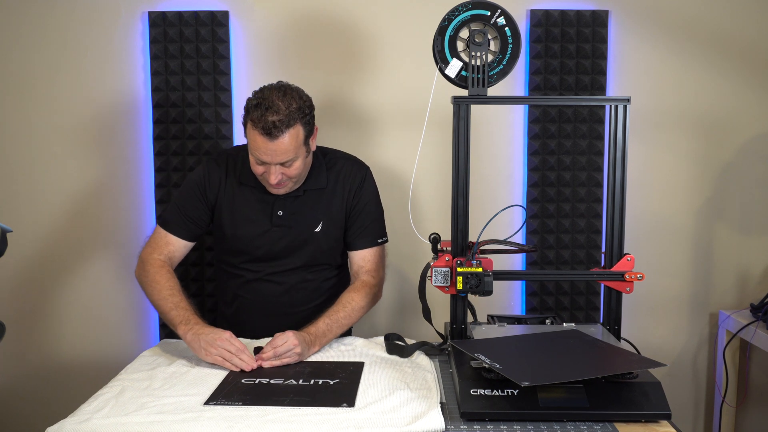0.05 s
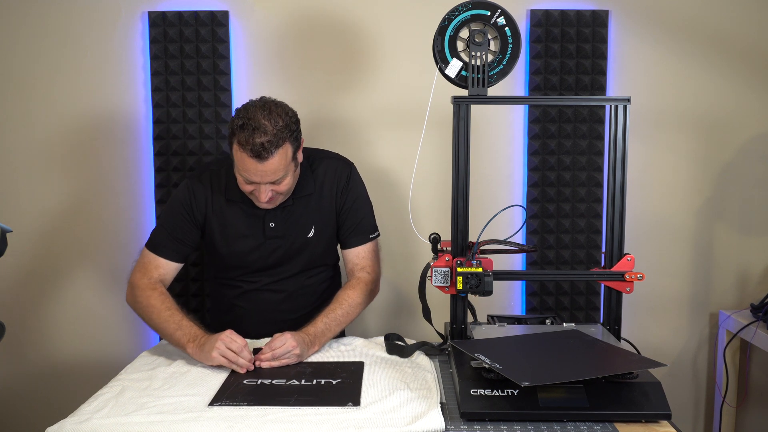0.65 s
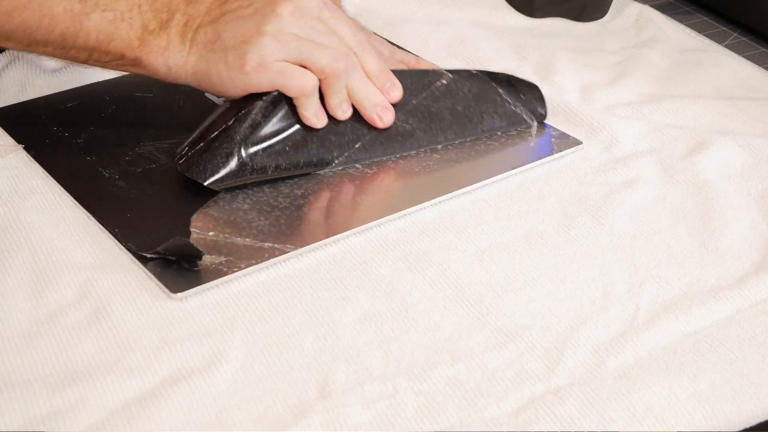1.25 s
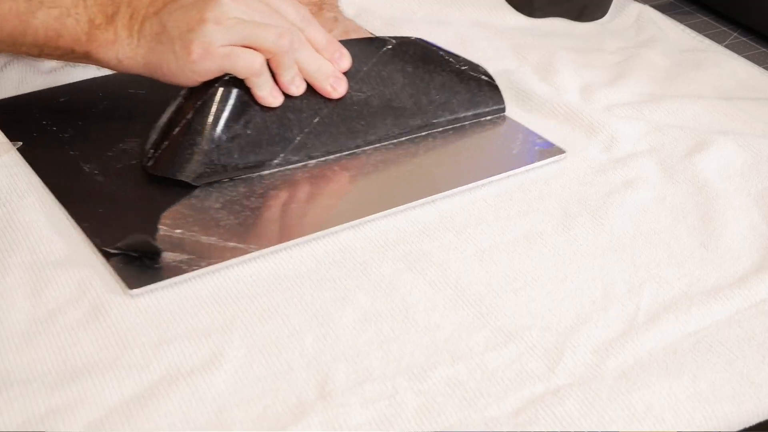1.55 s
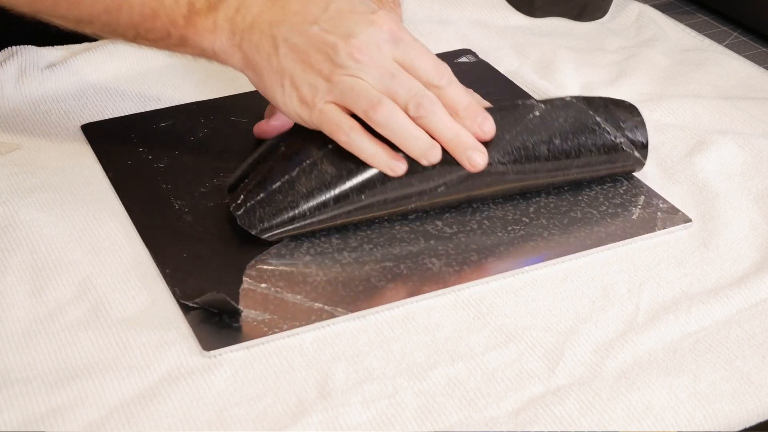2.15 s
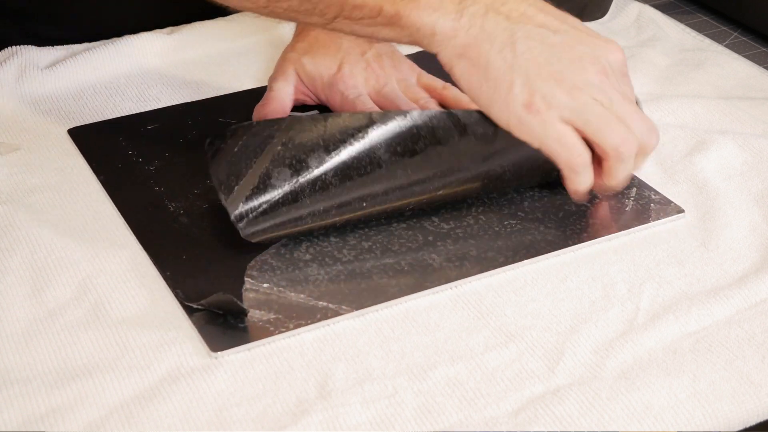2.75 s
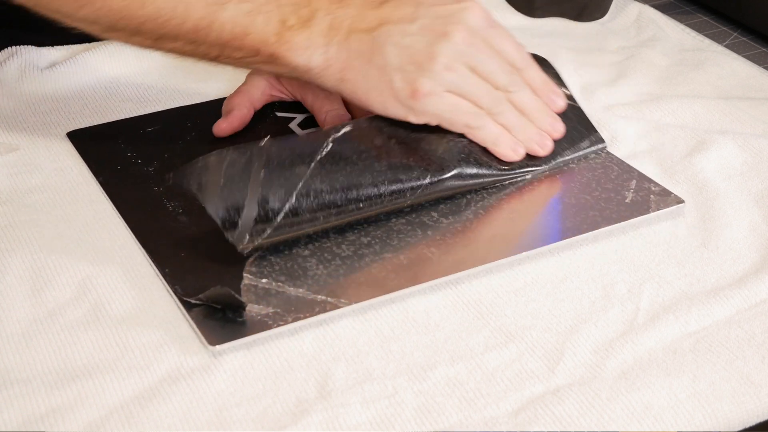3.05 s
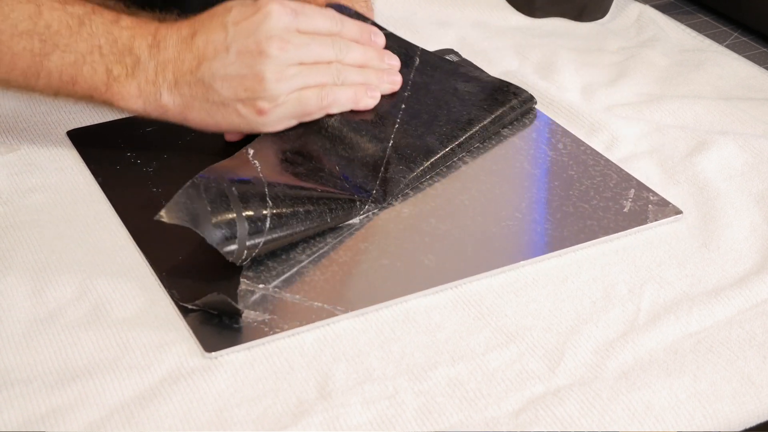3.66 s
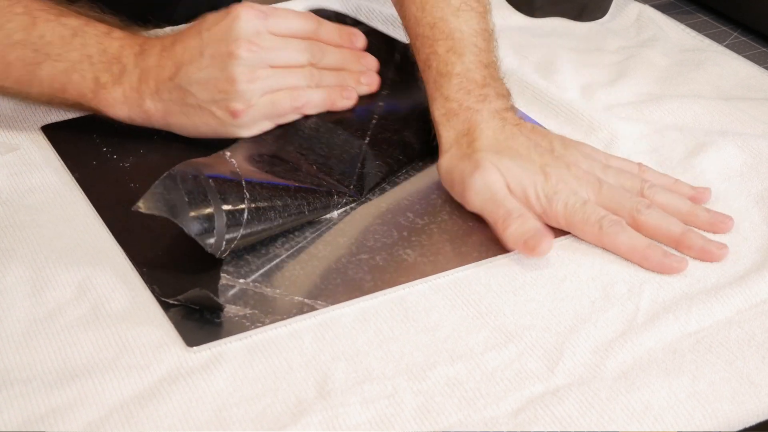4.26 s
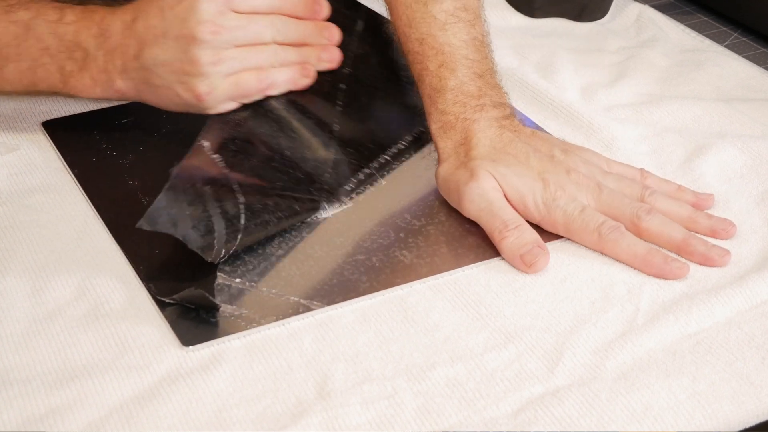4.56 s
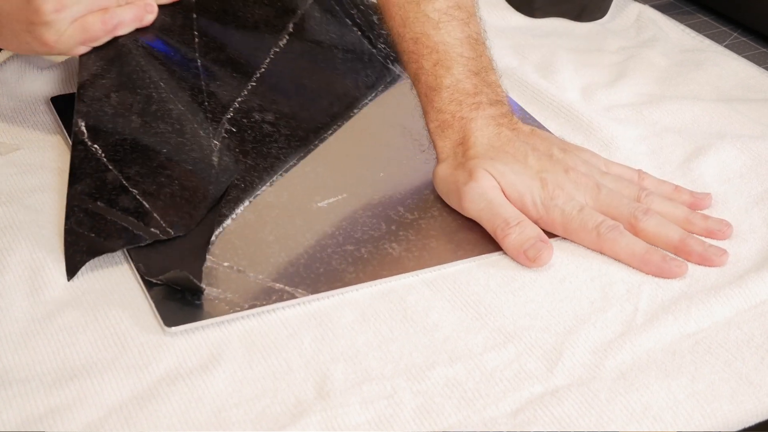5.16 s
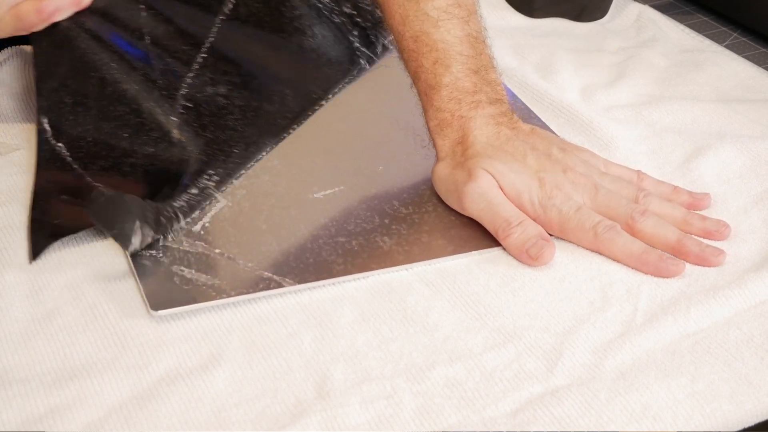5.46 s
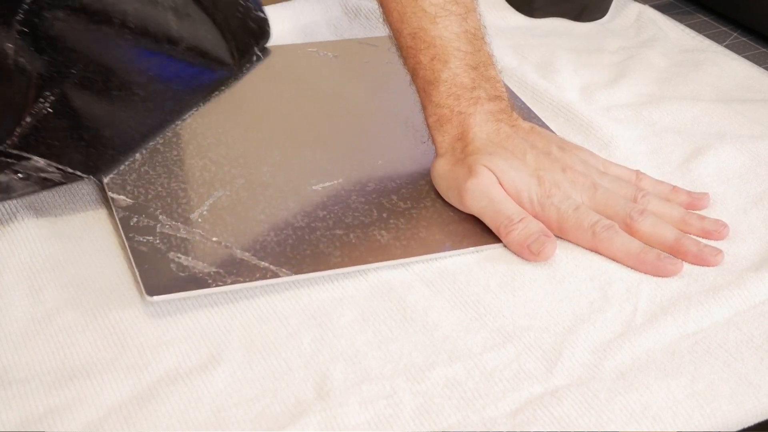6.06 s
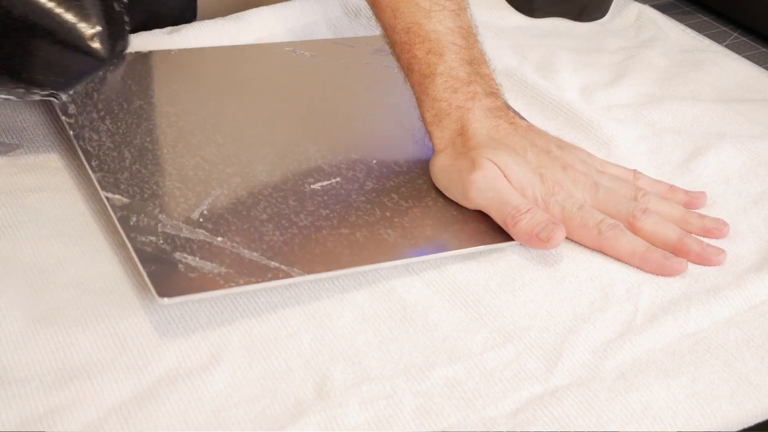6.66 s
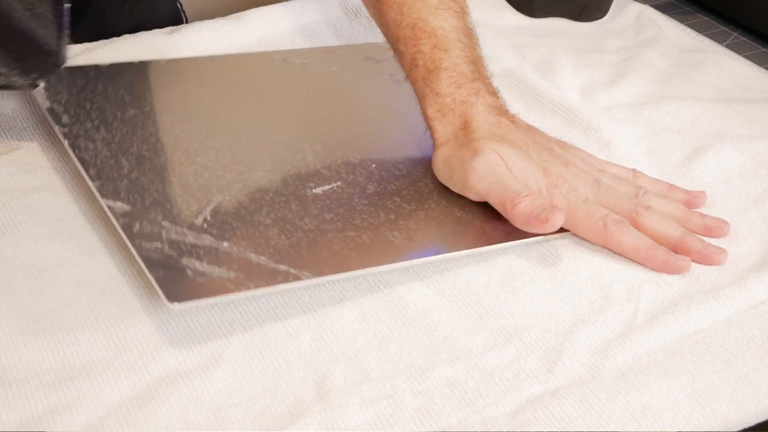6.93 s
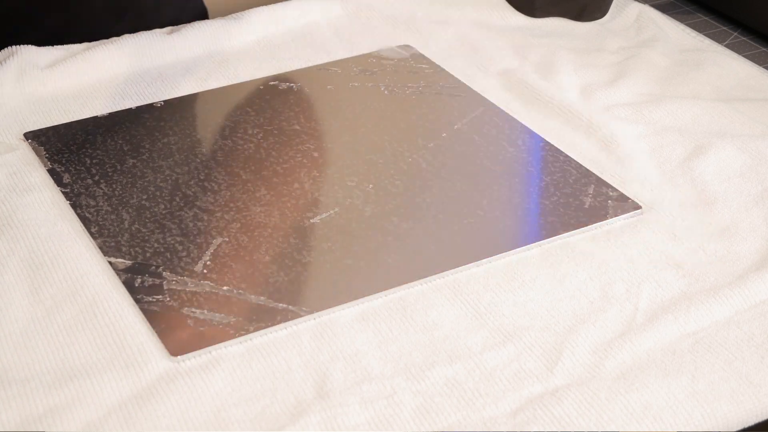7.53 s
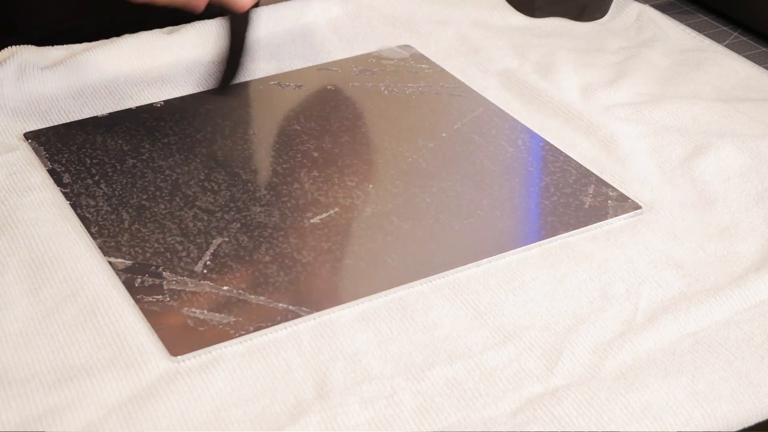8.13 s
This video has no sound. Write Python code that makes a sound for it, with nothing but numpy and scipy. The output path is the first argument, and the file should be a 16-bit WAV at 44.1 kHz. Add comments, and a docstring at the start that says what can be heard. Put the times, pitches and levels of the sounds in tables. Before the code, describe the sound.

A stiff sticky sheet is pulled off a metal plate by hand, heard close up in a quiet room with a faint hum. After a small fingernail squeak come two short, crackly pulls and a longer, stronger one, with sharp snaps and rustles as the sheet buckles. It tears free with a loud flap and the plate thumps softly onto a towel. Hollow crinkling follows as the sheet is crumpled.

```python
"""In a small, faintly humming room, hands brush a stiff adhesive sheet stuck to a metal plate on a towel.
A fingernail squeaks under one corner. Three pulls follow: countless glue threads snap in a dense fizz
while the sheet buckles, rustles and tugs at the plate, and the third pull lifts the plate.
At about 7 s the last corner lets go with a loud flap and the plate drops back with a soft thump.
Finally the loose sheet is crumpled, ringing like a hollow shell."""
import sys
import numpy as np
from scipy import signal
from scipy.fft import rfft, irfft, next_fast_len
from scipy.io import wavfile
from scipy.ndimage import uniform_filter1d

SR = 44100
rng = np.random.default_rng(int(sys.argv[2]) if len(sys.argv) > 2 else 0)


def transcribe(signal):
    """Save signal, clipped to [-1, 1], as a 16-bit WAV file at the path in sys.argv[1]."""
    frames = np.atleast_2d(signal).T
    limited = np.clip(frames, -1, 1)
    pcm = np.round(limited * 32767).astype(np.int16)
    wavfile.write(sys.argv[1], SR, pcm)


N = 369999
TOP_HZ, PIVOT_HZ = 15800, 2000  # top of the sound; centre about which tilts turn
CLICK_HZ = np.fft.rfftfreq(4096, 1 / SR)
SMALL_FLAP_UNTIL_S, HANDS_OFF_S, LOOSE_S = 2.9, 7.3, 7.6

# Colour of the room tone. Each row: frequency in Hz, relative level in dB.
AIR_COLOUR = [(15, 4), (28, -10.5), (45, -9), (80, -5.5), (170, -13), (340, -11.5), (1000, -17.5),
              (4200, -26), (16000, -36)]
# Ventilation and mains hum. Each row: frequency in Hz, rms level in dB.
HUM_TONES = [(29.3, -62.5), (119.7, -62)]
# The room's tail. Each row: frequency in Hz, seconds to fall 60 dB.
ROOM_DECAY = [(200, 0.16), (1000, 0.17), (4000, 0.19), (9000, 0.18), (16000, 0.2)]
# How alike the room is left and right. Each row: frequency in Hz, likeness from 0 to 1.
STEREO_LIKENESS = [(30, 0.8), (70, 0), (250, 0.66), (1000, 0.94), (3000, 1), (6000, 0.36), (14000, 0.7)]
# The plate is nearer the left. Each row: frequency in Hz, left minus right in dB.
STEREO_BALANCE = [(60, 3.5), (200, -0.5), (550, 3), (1200, 0.5), (2800, 1.5), (8000, 1)]
# Soft pushes on the padded table. Each row: start in seconds, level in dB, pitch in Hz, decay in seconds.
TABLE_THUMPS = [(2.84, -54, 60, 0.028), (4.186, -49.5, 62, .04), (6.331, -64, 105, .03),
                (7.012, -46, 99, 0.034), (7.07, -30.5, 63.6, 0.024), (7.14, -43, 112, 0.034)]
# Fader curve of the plate dragging on the towel. Each row: time in seconds, level in dB.
DRAG_CURVE = [(5.6, -80), (6.05, -56), (6.4, -54), (6.65, -58), (6.949, -49), (7.199, -49.5),
              (7.401, -65.5)]
# Glide of the fingernail. Each row: time in seconds, pitch in Hz, level in dB.
NAIL_GLIDE = [(.56, 4420, -72), (.578, 3900, -46), (.592, 3310, -67), (.607, 2894, -42.5),
              (.625, 2630, -74), (.67, 1705, -60), (.72, 1385, -63)]
# The plate's ring. Each row: pitch in Hz, relative level in dB, seconds to fall 60 dB.
PLATE_MODES = [(350, -2.5, 0.3), (473, 5.5, .2), (780, -7, .15), (940, -12, 0.19), (910, -4, 0.14),
               (1248, -4.5, 0.53), (1510, -2, 0.1), (1920, -15, 0.17), (1986, 12, 0.037), (2290, -15, 0.37)]
# Gain in dB of the two lowest modes while the plate is lifted.
LIFTED_MODE_DB = [0, 2.5]
# How the sheet radiates, then the added EQ of the small flap. Each row: frequency in Hz, gain in dB.
SHEET_EQ = [(40, -19), (150, -21), (230, -13), (330, -1), (400, -1.5), (480, 2.5), (570, -4), (740, 1.5),
            (1080, 0.5), (1450, 0.5), (2100, 2), (7000, 3), (11000, 0.5), (16000, -7.5)]
FLAP_EQ = [(200, 0), (290, -2.5), (470, -5.5), (660, 4.5), (870, -1.5), (1120, 2.5), (1800, -2), (4000, -1)]
# Centres in Hz of bass, middle, presence and treble, then each kind of event's EQ in dB in those bands.
EVENT_BANDS_HZ = [430, 1150, 3000, 9000]
KNOCK_EQ_DB = [-7.5, 0.5, 3.3, -4]
RUSTLE_EQ_DB = [-8, -2.2, 1, -0.5]
SNAP_EQ_DB = [-4.5, -1.9, -1, -0.4]
# Cues for jolts of the plate, folds and popping creases. Each row: start in seconds,
# time scale in seconds, note in Hz, relative level in dB, tilt in dB per octave.
PLATE_KNOCKS = [(1.534, 0.0052, 350, -51.5, -9.5), (1.714, 0.0061, 724, -46, -7.5),
                (4.8234, 0.0033, 370, -29, -4.5), (6.065, 0.0036, 517, -43.5, -10),
                (6.343, 0.0066, 620, -36.5, -7.5), (6.756, .008, 650, -36, -8),
                (7.005, 0.015, 1010, -19, -4), (7.0412, 0.0013, 910, -18.5, 0),
                (7.055, 0.018, 1400, -24, -3), (7.139, .012, 990, -25, -4.5),
                (7.16, 0.0071, 2000, -21, -3.2)]
FOLD_RUSTLES = [(0.079, 0.014, 4100, -56, 4), (0.484, 0.054, 7000, -53, 3.5),
                (0.93, 0.0086, 600, -51.5, -2.5), (1.194, .09, 950, -30.5, -2.5),
                (1.677, .04, 745, -39.5, 2.5), (2.213, 0.039, 690, -39.5, 2),
                (2.397, 0.033, 795, -33.5, -2), (2.43, 0.031, 1510, -31.5, -3.5),
                (2.575, 0.033, 1150, -41.5, -7), (2.757, 0.031, 2080, -42.5, -3.5),
                (3.26, 0.069, 1000, -50, -6), (3.929, 0.01, 1110, -46.5, -4),
                (3.955, 0.032, 990, -36, -2.5), (5.265, 0.026, 450, -53, -9.5),
                (5.37, 0.021, 460, -43.5, -7), (5.88, .025, 450, -43.5, -4), (6.49, 0.025, 450, -44, -3),
                (6.65, .03, 480, -51.5, -9.5), (6.992, 0.019, 990, -28, -1), (7.65, 0.11, 686, -34.5, -1),
                (7.84, 0.023, 680, -31, -2), (7.908, .02, 632, -34, 1.5), (7.938, 0.033, 580, -34.5, 1),
                (7.987, 0.012, 610, -33.5, -1), (8.16, 0.018, 3000, -40, 1.5),
                (8.196, .025, 566, -30, -2.6)]
CREASE_SNAPS = [(1.001, 0.001, 2700, -32.5, -1.5), (1.083, 0.0031, 2920, -37, 1.5),
                (1.2435, 0.0028, 2290, -31.5, 2), (1.299, 0.004, 730, -41.5, 5.5),
                (1.3313, 0.0044, 910, -33.5, 2), (1.392, 0.0033, 970, -36.5, 1),
                (1.4613, 0.0043, 930, -33.5, 2), (2.0648, 0.0082, 1020, -45.5, -0.5),
                (2.16, 0.00083, 750, -37.5, -3.5), (2.2253, 0.013, 660, -32.5, -2),
                (2.2409, 0.0033, 1060, -25.5, 1.7), (2.2571, 0.0013, 800, -31.5, -1.4),
                (2.473, 0.0014, 4360, -25, 0.5), (2.5172, 0.0021, 1370, -36.5, -1.8),
                (2.6355, 0.0033, 1130, -44, 1.8), (2.699, 0.0061, 1120, -39, 1.5),
                (2.751, 0.0037, 1130, -39.5, 2.8), (2.864, 0.0034, 3500, -47.5, -0.5),
                (2.9967, 0.0014, 670, -55, -6), (3.0517, 0.0039, 715, -48.5, -7),
                (3.077, 0.0021, 360, -45, -2), (3.5575, 0.0013, 5900, -32.5, -1.6),
                (3.725, 0.0081, 3650, -42, 1.6), (3.9434, 0.0034, 1170, -31, -2.5),
                (4.19, .001, 7000, -58.5, -1), (4.421, 0.0018, 786, -37, -3.5),
                (4.5305, .0053, 770, -39.5, -2), (4.5656, 0.0019, 1080, -31, 0.5),
                (4.608, 0.0029, 1090, -32, 2), (4.6807, 0.0026, 1060, -24, 1.9),
                (4.727, 0.0036, 1660, -42, 4), (4.7548, .0051, 1170, -32, 2.5),
                (4.77, .002, 1130, -38, -0.5), (4.7927, 0.002, 1120, -24, 0),
                (4.9282, 0.0061, 510, -42.5, -4), (4.97, 0.0026, 510, -37.5, -0.3),
                (5.289, 0.00083, 7450, -34, 1.5), (5.449, 0.0043, 6100, -27, 4.5),
                (5.4525, 0.0075, 1100, -33.5, -3.5), (5.6573, 0.0073, 490, -37, -0.5),
                (5.966, 0.0049, 1290, -29, -1.5), (6.366, 0.0021, 497, -54.5, 9),
                (6.837, 0.006, 1050, -36.5, 1), (6.8679, 0.014, 2530, -32, 1),
                (6.959, 0.0089, 3000, -35, -1), (7.2779, 0.0041, 2570, -34, -1.9),
                (7.678, 0.0091, 1730, -34.5, 5.5), (7.8313, 0.0036, 2040, -29.5, 3),
                (7.8736, .006, 580, -25, 3), (7.903, 0.0034, 605, -27.5, 1.5),
                (8.1712, 0.0035, 1170, -29.5, 2), (8.186, 0.0018, 3100, -26, 2),
                (8.3013, .0036, 4560, -36.5, 3), (8.3234, 0.01, 600, -32.5, 4),
                (8.362, 0.0015, 3020, -33.5, 1.5)]
# Centres in Hz of the peel bands: sheet flutter, tearing, fizz of the finest threads and sizzle.
PEEL_BANDS_HZ = [450, 1700, 9000, 12500]
# Hands slide over the sheet. Each row: start in seconds, length before release in seconds,
# relative level in dB, tilt in dB per octave.
HAND_SLIDES = [(0, 0.059, -93, 1.5), (0.508, 0.07, -93, 2), (0.578, 0.1, -92, 0.5), (0.75, 0.33, -99, 2.3),
               (0.213, 0.025, -99, 3.5), (1.618, 0.048, -85, -0.5), (1.79, 0.46, -93.5, -0.5),
               (2.36, 0.37, -89, -4.2), (2.814, 0.078, -91.5, -2), (3.759, 0.15, -85.5, -0.6),
               (4.295, 0.1, -95.5, 0), (6.853, 0.12, -73, -3), (7.146, 0.074, -70, -3.5),
               (7.635, 0.036, -75, -0.5), (7.847, 0.22, -78.5, -0.5), (8.165, 0.22, -77, -1)]
# EQ in dB of a slide, then of a pull, one value per peel band.
SLIDE_EQ_DB = [1.5, 2, -7.5, -10]
PULL_EQ_DB = [5, -0.5, -9.5, -4.5]
# How hard the glue tears, one curve per pull. Each row: time in seconds, relative level in dB.
PULL_CURVES = [
    [(0.95, -85.5), (1.04, -82), (1.16, -78.5), (1.24, -75), (1.38, -81), (1.53, -78), (1.62, -94.5)],
    [(2.96, -90), (2.985, -86.5), (3.17, -86.5), (3.32, -79.5), (3.57, -78.5), (3.65, -100)],
    [(4.41, -90), (4.47, -81.5), (4.72, -70.5), (4.88, -78.5), (5.09, -82.5), (5.23, -78.5), (5.38, -76),
     (5.66, -77), (5.8, -79.5), (5.98, -76), (6.17, -81), (6.53, -77), (6.82, -80.5), (7.0, -95)],
]
# A longer peel line is brighter. One tilt per pull, in dB per octave.
PULL_BRIGHTNESS = [0.24, 0.5, 1.0]
# Near the last corner flutter grows and sizzle fades. One slope per peel band, in dB per second.
PULL_DRIFT = [4.5, 1, -4, -5.5]


def amp(db):
    """Decibels to gain."""
    return 10 ** (np.asarray(db) / 20)


def unit(x):
    """Scales to an energy of one."""
    return x / np.sqrt(np.sum(x ** 2) + 1e-20)


def curve_at(points, hz):
    """Reads a curve on a log-frequency axis."""
    f, value = np.transpose(points)
    return np.interp(np.log(hz + 1), np.log(f + 1), value)


def add(mix, s, sound):
    """Mixes a sound in at s seconds."""
    part = mix[max(round(s * SR), 0):][:len(sound)]
    part += sound[:len(part)]


def sharpest_click(db):
    """The tightest click that has this spectrum."""
    log_gain = np.log(amp(np.r_[db, db[-2:0:-1]]))
    return irfft(np.exp(np.conj(signal.hilbert(log_gain)))[:len(db)])


def whiten(x, width_hz):
    """Evens out a sound's broad colour and keeps its grain."""
    z = rfft(x, 2 * len(x))
    power = uniform_filter1d(abs(z) ** 2, max(int(width_hz * 2 * len(x) / SR), 1))
    return irfft(z / np.sqrt(abs(power) + 1e-12))[:len(x)]


def clicks(samples, per_s, spread_db):
    """Randomly timed clicks of either sign; a few are much louder than the rest."""
    chance, size, sign = rng.random((samples, 3)).T
    return (chance < per_s / SR) * amp(spread_db * np.minimum(-np.log(1 - size), 4)) * np.sign(sign - .5)


def stereo_pair(z, likeness):
    """Narrows two unrelated spectra: a likeness of one is mono."""
    likeness = np.clip(likeness, 0, 1)
    return np.array([z[0], likeness * z[0] + np.sqrt(1 - likeness ** 2) * z[1]])


def tilted(db, tilt_db, hz):
    """Levels at the frequencies hz, leaning by tilt_db an octave."""
    return db + tilt_db * np.log2(np.array(hz) / PIVOT_HZ)


def room_tone(air_db=-56.5):
    """A faint bed of air under the steady hum of ventilation and mains."""
    size = next_fast_len(N)
    hz, t = np.fft.rfftfreq(size, 1 / SR), np.arange(N) / SR
    noise = stereo_pair(rfft(rng.standard_normal((2, size))), curve_at(STEREO_LIKENESS, hz))
    air = irfft(noise * amp(curve_at(AIR_COLOUR, hz)), size)[:, :N]
    hum = sum(amp(db) * np.sqrt(2) * np.sin(2 * np.pi * (f * t + rng.random())) for f, db in HUM_TONES)
    return amp(air_db) * unit(air) * np.sqrt(2 * N) + hum


def room_response(tail_db=-3, early_t60=0.069, bounce=0.6, dull_db=3.0):
    """Direct sound from one spot, a bounce, scatter from near things and the room's short tail."""
    t = np.arange(SR // 2) / SR
    hz, when, z = signal.stft(rng.standard_normal((2, len(t))), SR, nperseg=256)
    hz = hz[:, None]
    z = stereo_pair(z, curve_at(STEREO_LIKENESS, hz))
    z *= amp(-dull_db * hz / 10000)  # towel and foam soak up treble
    early = signal.istft(z * amp(-60 * when / early_t60), SR)[1][:, :len(t)]
    early *= 1 - np.exp(-t / 0.00054)
    tail = signal.istft(z[..., ::-1] * amp(-60 * when / curve_at(ROOM_DECAY, hz)), SR)[1][:, :len(t)]
    tail *= 1 - np.exp(-t / 0.02)
    paths = np.sqrt(2) * (unit(early) + amp(tail_db) * unit(tail))
    paths[:, 0] += 1  # direct sound
    arrival = round(rng.uniform(0.0022, .0033) * SR)
    paths[[0, 1], [arrival + 2, arrival]] += bounce  # reaches the right first
    return np.array([whiten(side, width_hz=220) for side in paths])


def room(x, spots=7, stay_s=.07, right_lag_s=.000053):
    """The sounding spot wanders over the sheet, and its reflections change with it."""
    spot = (np.arange(N) / SR // stay_s) % spots
    sends = (x * uniform_filter1d(1. * (spot == k), 64) for k in range(spots))
    wet = sum(signal.oaconvolve(send, room_response(), axes=1)[:, :N] for send in sends)
    size = next_fast_len(N)
    hz = np.fft.rfftfreq(size, 1 / SR)
    lean = amp(curve_at(STEREO_BALANCE, hz) / 2)
    pan = np.array([lean, np.exp(-2j * np.pi * hz * right_lag_s) / lean])
    return irfft(rfft(wet, size) * pan, size)[:, :N]


def table_thumps(attack_s=0.0037):
    """The table top gives a few slow swings under the hand and the plate."""
    out, t = np.zeros(N), np.arange(SR // 3) / SR
    for s, db, hz, decay in TABLE_THUMPS:
        envelope = (1 - np.exp(-t / attack_s)) * np.exp(-t / decay)
        add(out, s, amp(db) * np.sin(2 * np.pi * hz * t) * envelope)
    return out


def plate_drag(band_hz=(55, 170)):
    """A dull rumble as the tugged plate shifts on the towel."""
    rub = signal.sosfilt(signal.butter(2, band_hz, "band", fs=SR, output="sos"), rng.standard_normal(N))
    fader = amp(np.interp(np.arange(N) / SR, *np.transpose(DRAG_CURVE)))
    return unit(rub) * np.sqrt(N) * fader


def nail_squeak(width_hz=300):
    """The nail scratches under the corner with a falling, breathy tone."""
    s, hz, db = np.transpose(NAIL_GLIDE)
    t, out = np.arange(s[0], s[-1], 1 / SR), np.zeros(N)
    noise = [1, 1j] @ rng.standard_normal((2, SR))
    waver = signal.sosfilt(signal.butter(2, width_hz, fs=SR, output="sos"), noise)[:len(t)]
    tone = (waver * np.exp(2j * np.pi * np.cumsum(np.interp(t, s, hz)) / SR)).real
    add(out, s[0], unit(tone) * np.sqrt(len(t)) * amp(np.interp(t, s, db)))
    return out


def event_colour(eq_db, note_hz, db, tilt_db, hump_db=5.5, hump_octaves=0.97):
    """Band levels of one event: its kind's EQ, tilted, with a hump where the fold radiates best."""
    hump = hump_db * np.exp(-(np.log2(np.array(EVENT_BANDS_HZ) / note_hz) / hump_octaves) ** 2)
    return np.array(eq_db) + tilted(db, tilt_db, EVENT_BANDS_HZ) + hump


def sheet_click(note_hz, band_db, top_db, note_db=5, note_width=0.15, lag_at_1khz_s=0.000392):
    """One click of the sheet with the note of its fold; low bending waves arrive later."""
    widths_hz = np.diff([250, 700, 1800, 5000, 16000])
    density_db = band_db + 10 * np.log10(SR / 2 / widths_hz * SR / 50)  # from rms over 1/50 s
    body = curve_at(list(zip(EVENT_BANDS_HZ, density_db)), CLICK_HZ) + curve_at(SHEET_EQ, CLICK_HZ)
    detune = np.log((CLICK_HZ + 1) / note_hz)
    note = note_db * (1 / (1 + (detune / note_width) ** 2) - .5 * np.exp(-detune ** 2))
    click = sharpest_click(body + note + top_db * (CLICK_HZ / TOP_HZ) ** 2)
    return irfft(rfft(click) * np.exp(-4j * np.pi * lag_at_1khz_s * np.sqrt(1000 * CLICK_HZ)))


def plate_knocks(ring_db=-19, top_db=-8, trim_db=-3):
    """The sheet slaps and rattles against the plate, which rings briefly on the towel."""
    out, t = np.zeros(N), np.arange(16384) / SR
    ring = sum(amp(db - 60 * t / t60) * np.cos(2 * np.pi * hz * t) for hz, db, t60 in PLATE_MODES)
    for s, decay, hz, db, tilt_db in PLATE_KNOCKS:
        rattle = clicks(len(t), per_s=4000, spread_db=7.4) * (t / decay) ** 2 * np.exp(-4.2 * t / decay)
        slap = sheet_click(hz, event_colour(KNOCK_EQ_DB, hz, db, tilt_db), top_db)
        add(out, s, amp(trim_db) * signal.fftconvolve(whiten(rattle, width_hz=200), slap))
    return out + amp(ring_db) * signal.oaconvolve(out, .5 * unit(ring))[:N]


def lifted_plate(x, from_s=5.6, to_s=7.0):
    """Raised off the towel, the plate sings along in its two lowest modes."""
    t = np.arange(N) / SR
    drive = x * (t > from_s) * (t < to_s)
    for (hz, _, t60), db in zip(PLATE_MODES, LIFTED_MODE_DB):
        q = hz * t60 * np.pi / np.log(1000)
        x = x + amp(db) * signal.lfilter(*signal.iirpeak(hz, q, fs=SR), drive)
    return x


def curled_sheet(x, ring_hz=610, width_hz=42, ring_db=9.6):
    """Once it is loose, the sheet curls up and rings like a hollow shell."""
    loose = x * (np.arange(N) > LOOSE_S * SR)
    ring = signal.lfilter(*signal.iirpeak(ring_hz, ring_hz / width_hz, fs=SR), loose)
    return x - 0.35 * loose + amp(ring_db) * ring


def small_flap(x):
    """At first only a small stiff flap is free: it rings higher, with a hollow rasp."""
    early = x * (np.arange(N) < SMALL_FLAP_UNTIL_S * SR)
    rasp = sharpest_click(curve_at(FLAP_EQ, CLICK_HZ))
    return x - early + signal.oaconvolve(early, rasp[None], axes=1)[:, :N]


def fold_rustles(cracks_per_s=2200, spread_db=2.0, top_db=-9, trim_db=-1):
    """Swells of tiny cracks as the sheet folds and crumples."""
    out, t = np.zeros(N), np.arange(12288) / SR
    for s, length, hz, db, tilt_db in FOLD_RUSTLES:
        swell = t / length * np.exp(-(1.65 * t / length) ** 2)
        cracks = whiten(clicks(len(t), cracks_per_s, spread_db) * swell, width_hz=300)
        fold = sheet_click(hz, event_colour(RUSTLE_EQ_DB, hz, db, tilt_db), top_db)
        add(out, s, amp(trim_db) * signal.fftconvolve(cracks, fold))
    return out


def crease_snaps(crackle_db=-1.5, crackle_hz=6500, slack_db=-8, trim_db=-2.5, usual_decay_s=0.0023):
    """A crease pops through with a sharp click and a short run of duller cracks; quick pops are crisper."""
    out, t = np.zeros(N), np.arange(4096) / SR
    for s, decay, hz, db, tilt_db in CREASE_SNAPS:
        crispness = np.log2(usual_decay_s / decay)
        cracks = whiten(clicks(len(t), per_s=3500, spread_db=3.0) * np.exp(-t / decay), width_hz=700)
        run = amp(crackle_db) * signal.lfilter(*signal.butter(1, crackle_hz, fs=SR), cracks)
        attack = amp(0.5 * crispness + slack_db * (s > LOOSE_S))  # a slack sheet pops softly
        run *= np.sqrt(2 - min(attack, 1) ** 2)  # softer attack, more crackle
        run[0] += attack
        pop = sheet_click(hz, event_colour(SNAP_EQ_DB, hz, db, tilt_db), top_db=-6 + 6 * crispness)
        add(out, s, amp(trim_db) * signal.fftconvolve(run, pop))
    return out


def hand_gestures(t, touch_db=-105, drift_from_s=4.97, attack_s=0.014, release_s=0.062):
    """A fader for each peel band: faint steady brushing, pulls that tear the glue, and slides."""
    power = amp(touch_db + np.c_[SLIDE_EQ_DB]) ** 2 * (t < HANDS_OFF_S)
    pull_eq = np.c_[PULL_EQ_DB] + np.c_[PULL_DRIFT] * np.maximum(t - drift_from_s, 0)
    for pull, tilt_db in zip(PULL_CURVES, PULL_BRIGHTNESS):
        s, db = np.transpose(pull)
        tear_db = np.interp(t, s, db) + pull_eq + tilted(0, tilt_db, PEEL_BANDS_HZ)[:, None]
        power += amp(tear_db) ** 2 * (t >= s[0]) * (t < s[-1])
    for s, length, db, tilt_db in HAND_SLIDES:
        stroke = np.clip((t - s) / attack_s, 0, 1) * np.exp(-np.maximum(t - s - length, 0) / release_s)
        power += np.outer(amp(tilted(db, tilt_db, PEEL_BANDS_HZ) + SLIDE_EQ_DB), stroke) ** 2
    return np.sqrt(power)


def glue_peel(threads_per_s=7000, ticks_per_s=130, slip_db=1.95, slip_hz=70, wide_above_hz=11000):
    """Glue threads snap in surges as the peel line sticks and slips; the same grain voices the slides."""
    t, size = np.arange(N) / SR, next_fast_len(N)
    hz = np.fft.rfftfreq(size, 1 / SR)
    surge = amp(slip_db * np.interp(t * slip_hz, np.arange(4000), rng.standard_normal(4000)))
    ticks = 0.73 * unit(clicks(N, ticks_per_s, spread_db=1.5))  # thicker strands of glue
    threads = [unit(clicks(N, threads_per_s, spread_db=3)) for side in range(2)]
    fizz = np.array([unit((side + ticks) * surge) for side in threads]) * np.sqrt(N * SR / 2)
    likeness = np.exp(-(hz / wide_above_hz) ** 2)  # the peel line is long, so its treble spreads wide
    spectrum = stereo_pair(rfft(fizz, size), likeness) * amp(curve_at(SHEET_EQ, hz))
    out, steps = np.zeros((2, N)), t[::64]
    for solo, fader in zip(np.eye(len(PEEL_BANDS_HZ)), hand_gestures(steps)):
        band = irfft(spectrum * curve_at(list(zip(PEEL_BANDS_HZ, solo)), hz), size)[:, :N]
        out += np.interp(t, steps, fader) * band
    return out


def scene():
    """Sheet, plate and nail play into the room, over table thumps and room tone."""
    sheet = lifted_plate(glue_peel()) + crease_snaps() + fold_rustles()
    sheet = curled_sheet(small_flap(sheet))
    return room(sheet + plate_knocks() + nail_squeak() + plate_drag()) + table_thumps() + room_tone()


def record(dry):
    """Clips at full scale and cuts the highest treble."""
    lowpass = signal.firwin(511, TOP_HZ, window=("kaiser", 9), fs=SR)
    return signal.oaconvolve(np.clip(dry, -1, 1), lowpass[None], "same")


dry = scene()
out = record(dry)
transcribe(out)
```